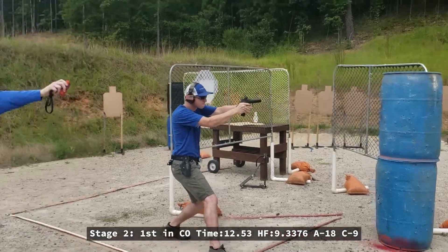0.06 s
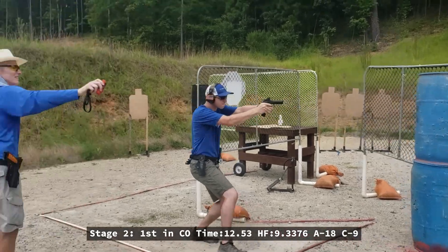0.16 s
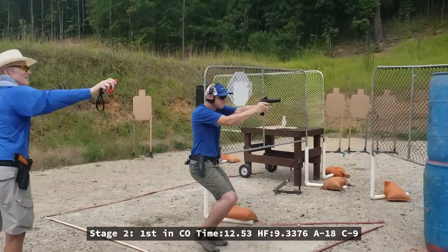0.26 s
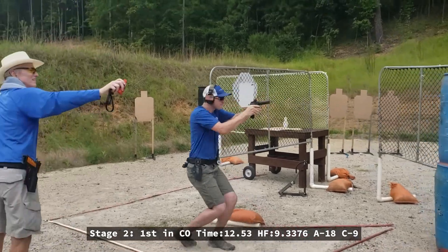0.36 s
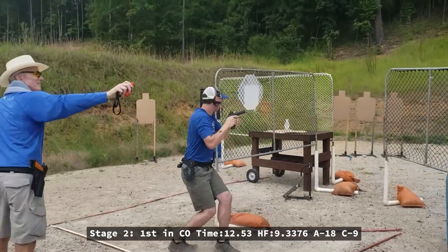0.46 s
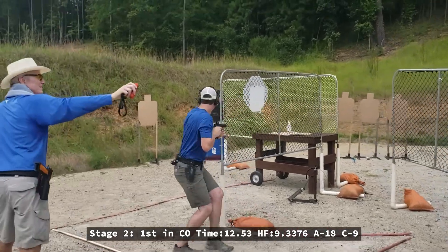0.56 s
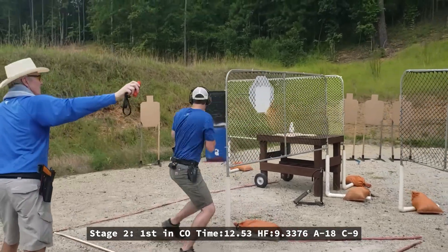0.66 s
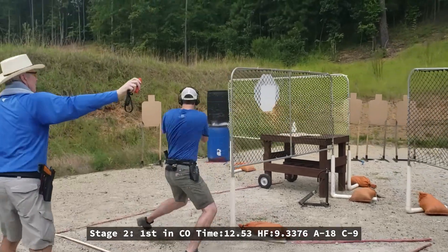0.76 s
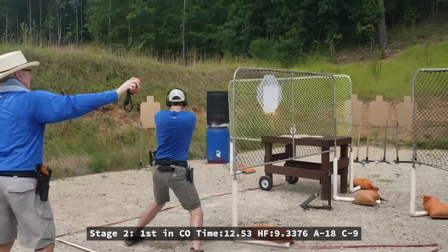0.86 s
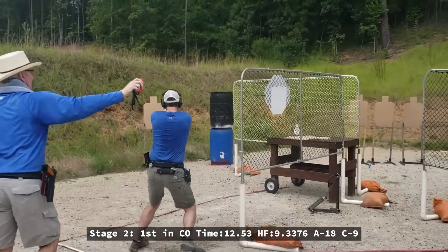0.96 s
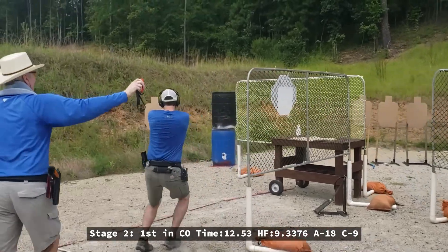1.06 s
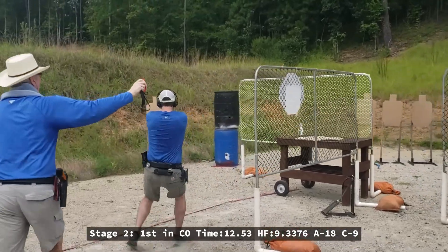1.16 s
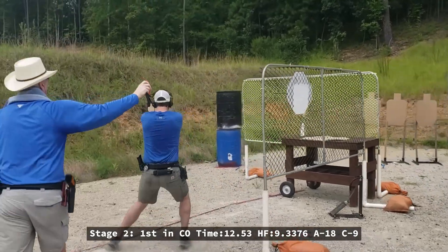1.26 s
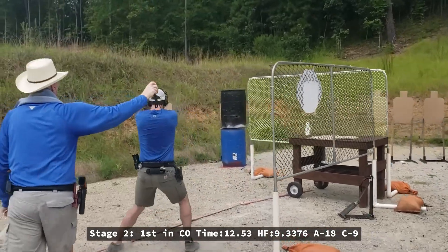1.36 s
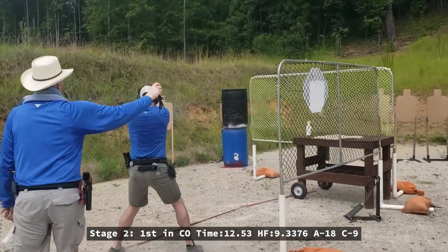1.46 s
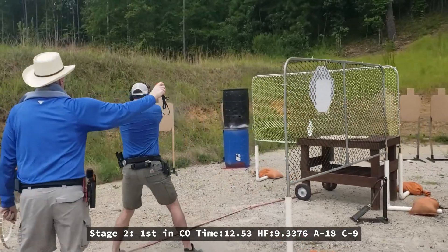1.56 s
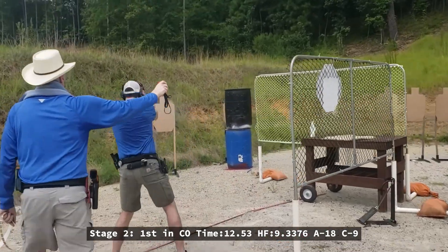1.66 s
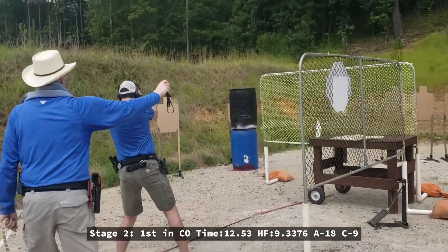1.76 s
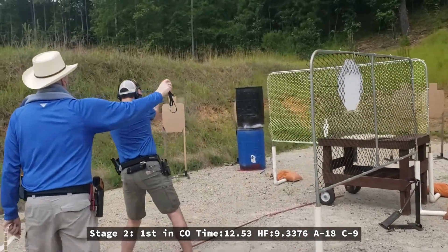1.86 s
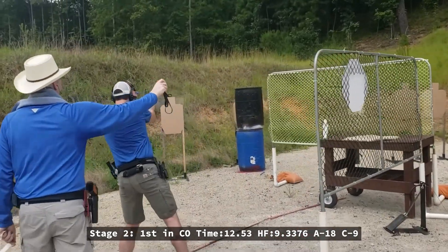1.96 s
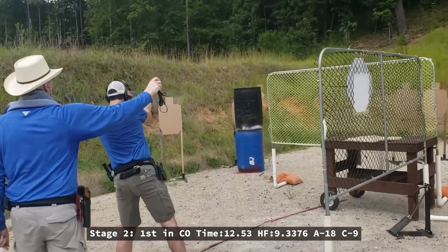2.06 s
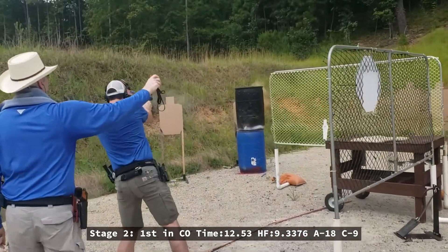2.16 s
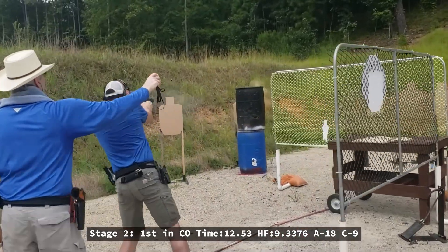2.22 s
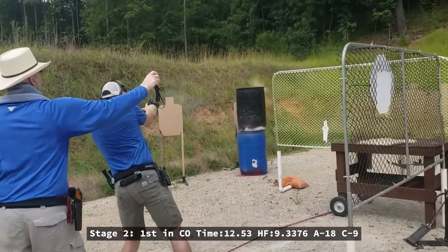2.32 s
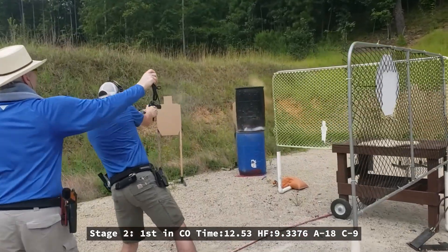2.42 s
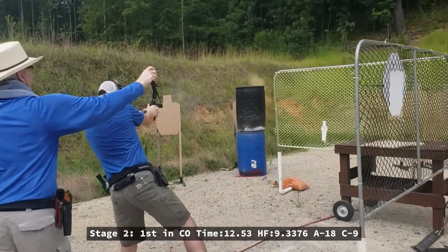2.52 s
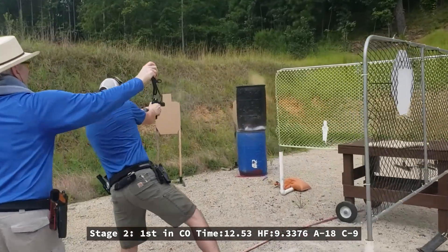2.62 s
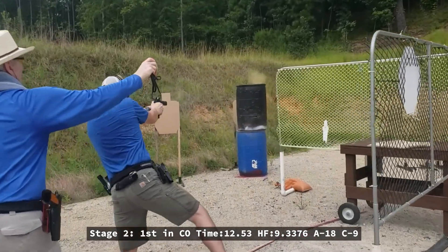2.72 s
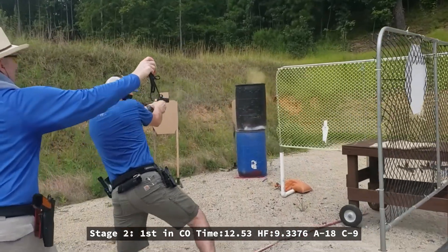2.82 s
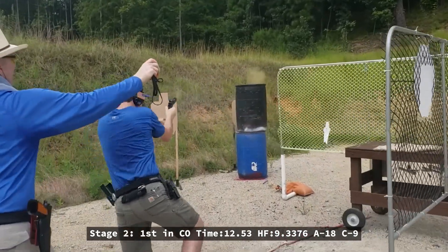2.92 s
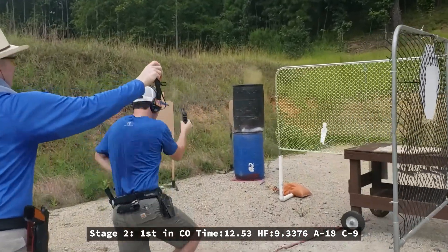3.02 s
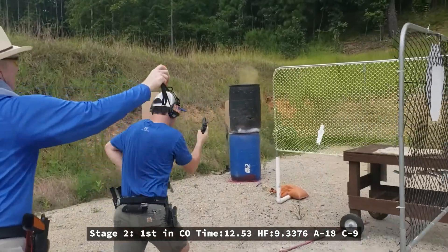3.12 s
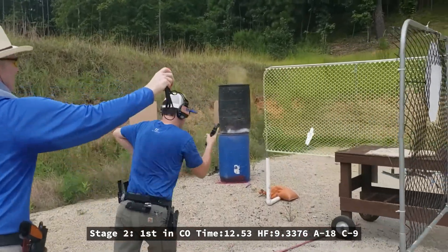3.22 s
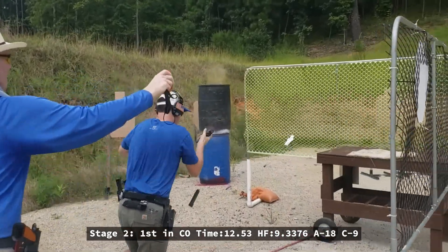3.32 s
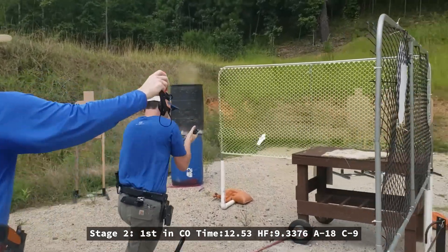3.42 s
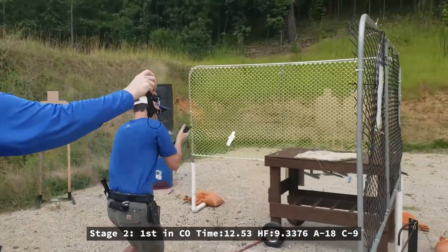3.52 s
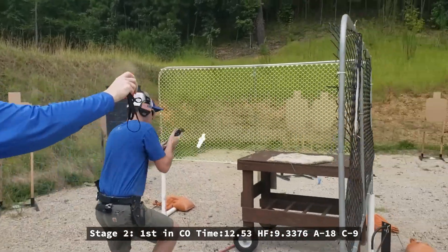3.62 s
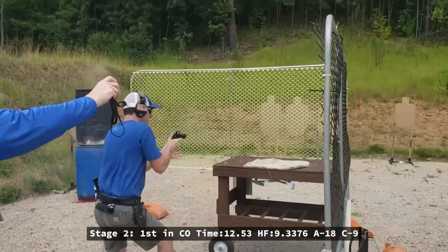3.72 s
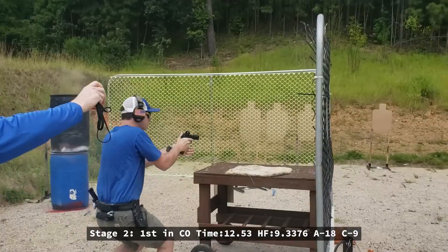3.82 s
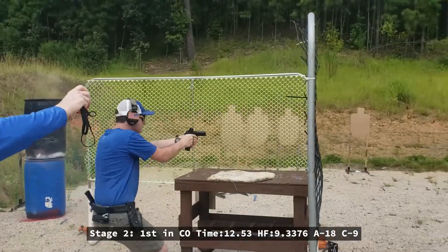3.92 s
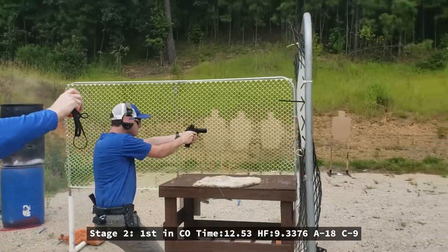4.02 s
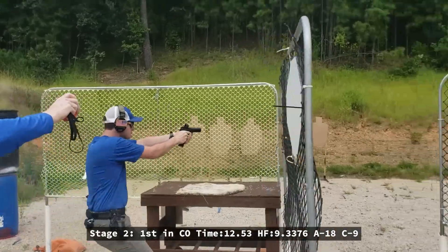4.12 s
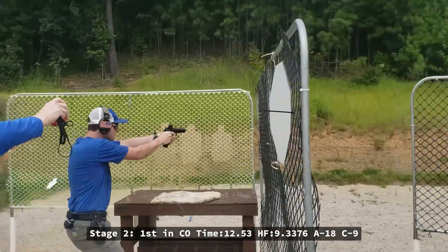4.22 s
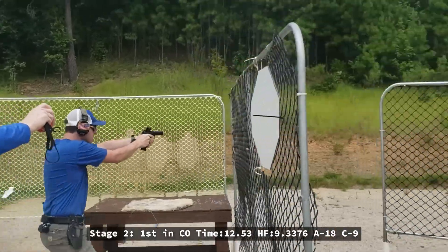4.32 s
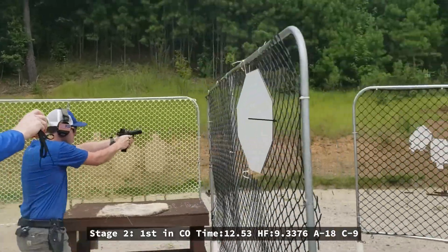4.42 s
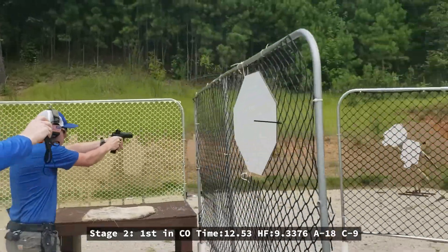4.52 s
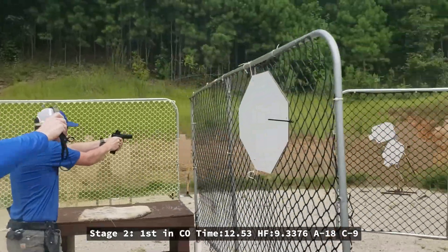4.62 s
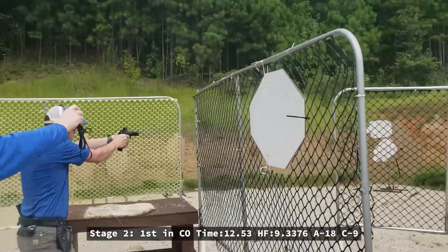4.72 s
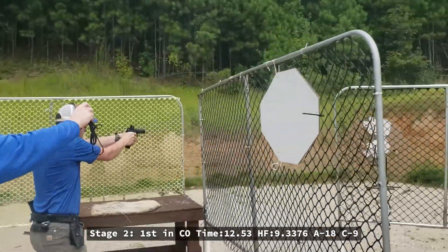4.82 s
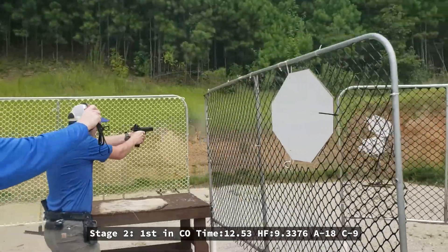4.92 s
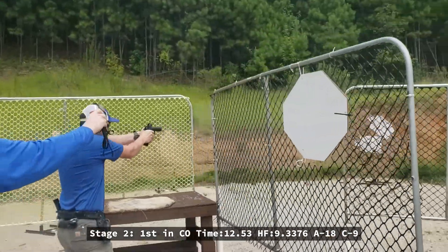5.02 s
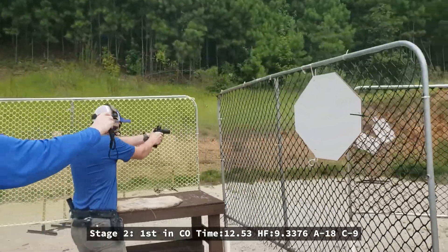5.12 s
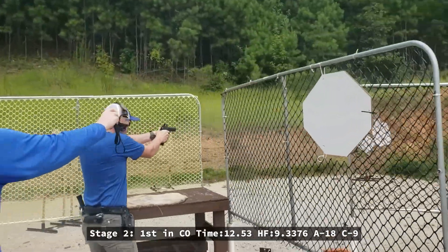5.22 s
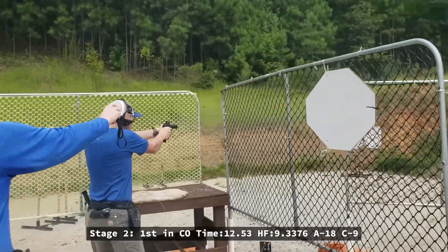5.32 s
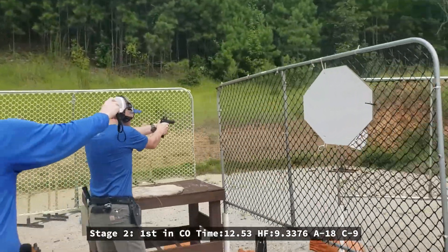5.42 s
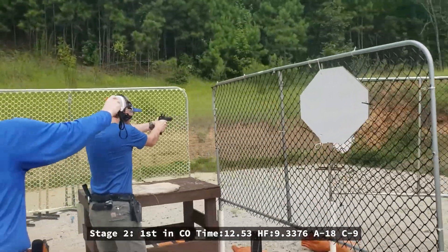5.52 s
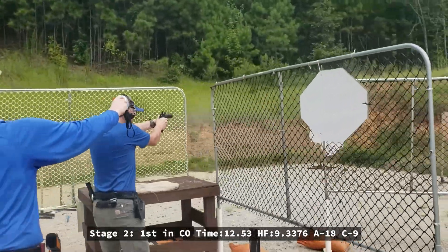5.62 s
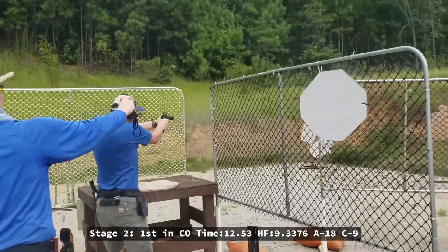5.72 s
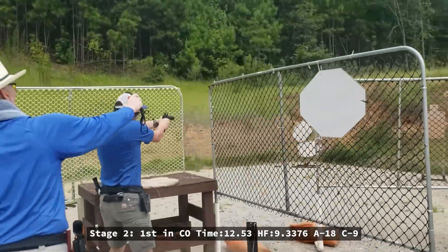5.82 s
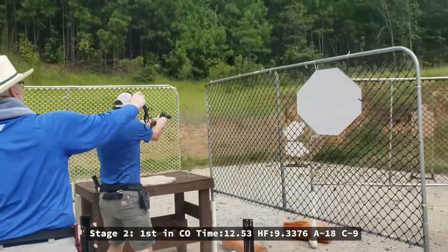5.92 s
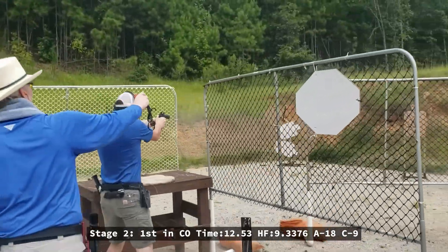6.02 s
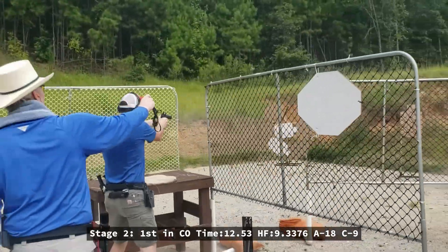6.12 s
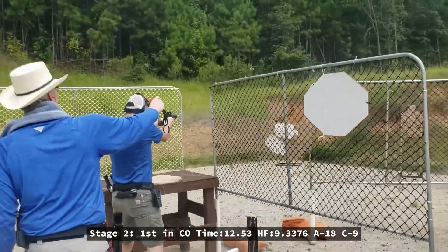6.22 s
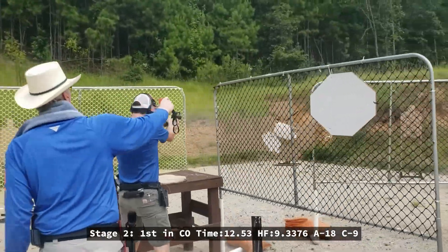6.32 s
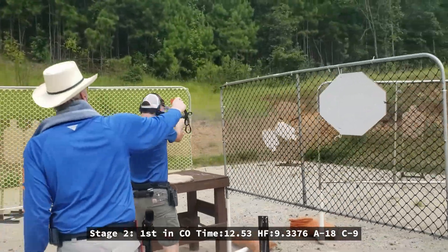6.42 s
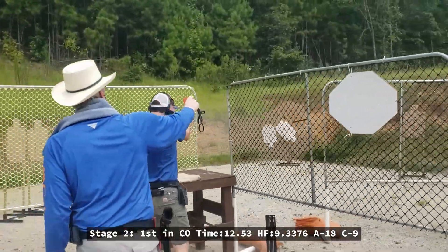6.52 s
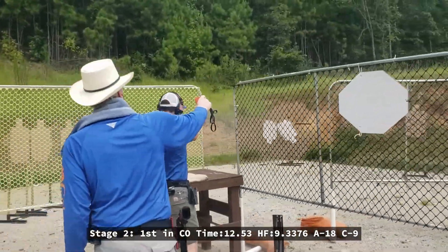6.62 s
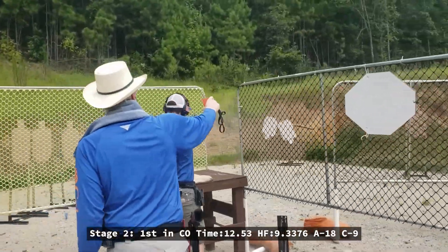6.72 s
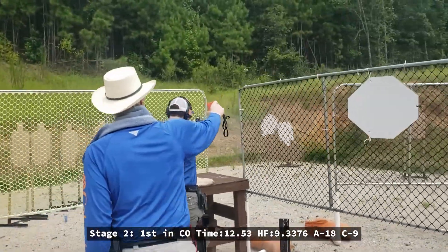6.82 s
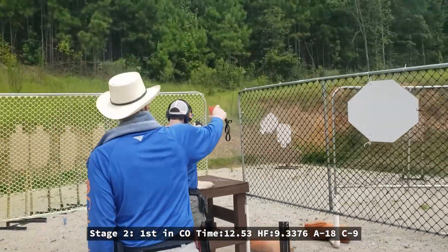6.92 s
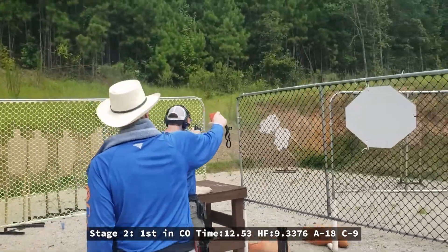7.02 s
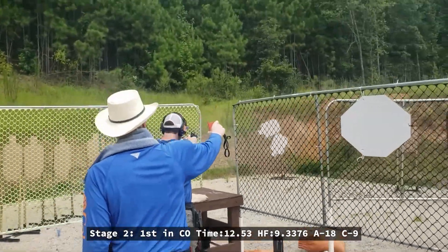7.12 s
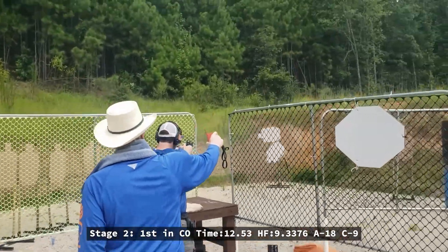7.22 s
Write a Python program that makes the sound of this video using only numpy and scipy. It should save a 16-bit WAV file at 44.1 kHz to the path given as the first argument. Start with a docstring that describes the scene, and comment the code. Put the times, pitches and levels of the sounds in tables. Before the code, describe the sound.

Sharp, overdriven pistol shots fire in quick pairs and a steady closing string, echoing off berms and woods; a struck steel plate sings midway.

```python
"""A gunshot is already rolling through the woods in a faint breeze; a pistol then fires sixteen quick shots.
Each shot is a shock front plus scattered noise, a pressure push and a microphone thump; it bounces off
gravel, prop and berm, fills the earth-walled bay, rolls through the woods and saturates the microphone.
Brass cases tinkle (paired high modes), shoes scuff gravel (grainy noise swells), and one bullet rings a
steel plate (decaying modes and a tone that swells at each port in turn)."""
import sys
import numpy as np
from scipy import signal
from scipy.fft import rfft, irfft, next_fast_len
from scipy.io import wavfile
from scipy.ndimage import uniform_filter1d, map_coordinates

SR = 44100
rng = np.random.default_rng(int(sys.argv[2]) if len(sys.argv) > 2 else 0)


def generate_wav(sig):
    """Save sig (samples, or channels by samples) to the path in sys.argv[1] as 16-bit PCM at SR."""
    pcm = np.round(np.clip(np.atleast_2d(sig).T, -1, 1) * 32767).astype(np.int16)
    wavfile.write(sys.argv[1], SR, pcm)


N = 320587

# pistol shots: (time [s], strength [dB], tilt [dB/octave], L-R [dB], pressure push [dB],
# microphone thump [dB], thump L-R [dB])
SHOTS = [(0.1146, -.5, -.7, 2, -11.5, -21, -7), (0.3136, -0.87, -1.5, 0.5, -10.5, -17, -6.5),
         (1.3311, -1, -2.7, 1.4, -20, -26, -7.5), (1.543, -1, -2.5, 0.5, -25, -33, 15),
         (1.9864, 1, 0.5, 0, -13.5, -19.5, 0), (2.233, 0.5, -2.5, -2.7, -20, -29, -16.5),
         (2.831, 2.2, -3.5, -3.5, -18.5, -25, -11.5), (4.4948, 0.34, -0.2, 3.5, -13, -18, 7),
         (4.725, -.3, -1.4, -6.5, -12, -18.5, 3.5), (5.0107, 0, 0, -1.8, -12.5, -19, -1.5),
         (5.2666, -0.7, -0.2, 4.5, -15.5, -14, -7.5), (5.6615, -0.7, 0.3, -2.5, -14.5, -17.5, -8),
         (5.9246, -.5, -0.5, 0.4, -14, -21, 8), (6.2396, -0.06, 0, 1.4, -28.5, -35.5, 1),
         (6.4933, -0.54, 0.2, 2.5, -24.5, -31.5, 10), (6.8134, 0, -.3, 2, -30, -39, -3)]
# sound paths shared by the shots from one stance: (from time [s], direct [dB], ground [dB], prop delay [s],
# prop [dB], berm delay [s], berm [dB], berm t60 [s], far slap delay [s], far slap [dB])
STANCES = [(0, -15.5, -16.5, .007, -15.5, 0.025, -21.5, .06, .1228, -37),
           (1, -14, -17.5, .0125, -19, .026, -18, .028, 0.16, -48),
           (1.8, -14.5, -22, .0114, -15.5, 0.025, -18, .026, 0.15, -51),
           (4, -16.5, -17, .010, -19.5, .039, -20.5, .013, .15, -36.5),
           (5.15, -17, -15, .0115, -19.5, .0404, -19.5, 0.011, .11, -43),
           (6.1, -16.5, -17, .012, -17, .0418, -20.5, 0.014, 0.13, -47)]
# a shot already rolling through the woods: (time [s], level [dB])
EARLIER_SHOT = (-0.35, -36.5)
# shoes on gravel: (time [s], level [dB], length, twice the swell's rise [s], tilt [dB/octave])
STEPS = [(1.17, -62.5, 0.07, -4.5), (3.505, -57, 0.043, -2), (3.594, -42.5, .013, 5.5),
         (3.607, -43, 0.023, 6.5), (3.744, -53, 0.017, 3.5), (3.825, -63, 0.014, 1), (3.947, -61.5, .01, 3),
         (4.083, -63.5, 0.033, -4), (4.394, -61, 0.056, -1), (4.46, -57.5, 0.018, -1.5)]
# run to the last stance: (start [s], end [s])
RUN_S = (3.2, 4.36)
# spent cases landing: (time [s], level [dB], lower mode [Hz])
CASES = [(.575, -57.5, 11520), (.884, -59, 9880), (1.094, -59, 11050), (1.15, -52.5, 11000),
         (1.215, -56, 10100), (3.115, -47, 10550), (4.275, -65, 10460)]
# steel plate's upper modes: (pitch [Hz], level [dB], t60 [s])
PLATE_MODES = [(2820, -48.5, 0.56), (3343, -48, 0.32), (4130, -39, 0.28), (4377, -39, 0.48),
               (4670, -45, 0.25), (4867, -42, .23), (5170, -33, 0.37), (5145, -31, 0.12), (5437, -41, .18),
               (6735, -29.5, 0.26), (7892, -26.5, .17), (10500, -38.5, .12), (12255, -33.5, 0.14),
               (12560, -37.5, .1)]
# where each port meets its first null: (left [lobes], right [lobes])
PORT_NULL_LOBES = (0.66, .25)
# noise spectra of blast, bay, woods, breeze and far slap: (frequency [Hz], density [dB/Hz])
CRACK_SPECTRUM = [(40, -24), (150, 3.5), (400, -1), (700, 8.5), (1400, 4.5), (3000, 5), (6000, -3.5),
                  (15000, -5.5)]
BAY_SPECTRUM = [(30, -3.5), (100, -0.5), (300, 1), (750, 5.5), (1500, 2), (3000, 4.5), (6000, -1),
                (15000, -7)]
WOODS_SPECTRUM = [(30, -9.5), (90, -5), (170, -4.5), (330, -1), (800, 0.5), (1400, 1), (2200, -0.5),
                  (3500, 2), (5000, 3), (9000, -0.5), (15000, -8.5)]
BREEZE_SPECTRUM = [(25, -2.5), (70, 3), (200, -5), (800, 2), (1500, -2), (3000, -3.5), (6000, -12),
                   (15000, -15.5)]
SLAP_SPECTRUM = [(300, -20.5), (2000, -2.5), (4800, 2), (15000, -11.5)]
# microphone port response: (frequency [Hz], gain [dB])
MIC_RESPONSE = [(20, -7), (45, 0), (700, 3), (1500, 2), (2300, -4), (3300, -0.5), (4000, 2.5), (5000, 11.5),
                (5900, 3.5), (6800, 1), (8300, -14), (9700, 0), (11500, 3.5), (14600, -1.5), (15100, -27),
                (16500, -44)]
# decay of bay and woods: (frequency [Hz], t60 [s])
BAY_T60 = [(60, 0.22), (300, 0.22), (1000, 0.23), (5000, .21), (14000, 0.21)]
WOODS_T60 = [(60, 0.51), (300, 1.27), (900, 1.63), (2500, 1.44), (5000, 0.94), (11000, 0.78)]
# left-right likeness of noise: (frequency [Hz], correlation [0..1])
LIKENESS = [(100, 0.66), (300, .75), (600, .55), (1200, 0.0028), (3000, 0.0032)]

BAY_DB, WOODS_DB = -18, -40.6  # answers to a shot of strength 0 dB
GROUND_DELAY_S = .0033
PROP_T60_S, PROP_TILT_DB_PER_OCT, PROP_PAN_DB = 0.024, -1.76, 0  # pans are L-R
BERM_TILT_DB_PER_OCT, BERM_PAN_DB = -.4, -2.5
ECHO_PAN_SCATTER_DB = 1.5  # from shot to shot
SLAP_GAP_S, SLAP_T60_S = 0.0086, 0.015  # the slap comes back twice
GRIT_DB, GRIT_SCATTER_DB, GRIT_LENGTH_S, GRIT_TILT_DB_PER_OCT = -67, 1.5, 0.026, 0.2
# plate's lowest mode
TONE_HZ, TONE_DB, TONE_RISE_S, TONE_T60_S = 1821, -35.5, .15, 2.08
TONE_LEAD_RAD = 1.35  # of the right port
LOBE_S, LOBE_FLOOR_DB = .447, -18.5  # passing time of the first lobe; depth between lobes
LANDING_S, LANDED_T60_S = 0.56, .2  # time from hit to ground; added decay from there on
SATURATION_LEVEL, TOP_HZ = .5, 16500


def amp(db):
    """Decibels to gain."""
    return 10 ** (np.asarray(db) / 20)


def unit(x):
    """Scale to rms 1."""
    return x / np.sqrt(np.mean(x ** 2) + 1e-20)


def along(points, hz):
    """Read (frequency, value) points on a log-frequency axis."""
    point_hz, values = np.transpose(points)
    return np.interp(np.log(hz + 1), np.log(point_hz), values)


def clock(seconds):
    """Sample times from zero."""
    return np.arange(next_fast_len(int(seconds * SR))) / SR


def fade(t, t60):
    """Exponential decay by 60 dB in t60 seconds."""
    return np.exp(-np.log(1000) * t / np.maximum(t60, 1e-4))


def panned(db):
    """Left and right gains for a level difference."""
    return amp(np.array([[db], [-db]]) / 2)


def add(track, s, sound):
    """Mix a sound into the stereo track at time s, which may lie before the start."""
    start = round(s * SR)
    part = sound[..., max(-start, 0):N - start]
    track[:, max(start, 0):][:, :part.shape[-1]] += part


def noise(t, spectrum, tilt_db=0):
    """Coloured stereo noise of rms 1, alike at the two ports in the bass only; tilt acts above 700 Hz."""
    hz = np.fft.rfftfreq(len(t), 1 / SR)
    turn = np.arccos(np.clip(along(LIKENESS, hz), -1, 1)) / 2
    gain = amp(along(spectrum, hz) + tilt_db * np.log2(np.maximum(hz, 700)))
    white = rfft(rng.standard_normal((2, len(t))))
    mid, side = irfft(white * gain * [np.cos(turn), np.sin(turn)], len(t))
    return unit(np.array([mid + side, mid - side]))


def tail(t, spectrum, t60s, patchy_db, tilt_db):
    """Scattered sound, returning in uneven patches, in which each frequency dies at its own speed."""
    hz, s, z = signal.stft(noise(t, spectrum, tilt_db), SR, nperseg=512)
    field = uniform_filter1d(rng.standard_normal(z.shape[1:]), size=7, axis=0)
    field = uniform_filter1d(field, size=4, axis=1)
    patches = unit(amp(patchy_db * unit(field)))
    decay = fade(s, along(t60s, hz)[:, None])
    return signal.istft(z * patches * decay, SR, nperseg=512)[1][:, :len(t)]


def flutter(t, rate, depth_db):
    """A smooth random gain of rms 1, rate knots a second."""
    knots = rng.standard_normal(int(t[-1] * rate) + 4)
    return unit(amp(depth_db * map_coordinates(knots, [t * rate], mode="nearest")))


def shock(t, length):
    """Blast wave: a pressure jump that falls through zero into a longer suction."""
    u = np.maximum(t, 0) / length
    return (t > 0) * (1 - u) * np.exp(-u)


def crack(t60, tilt_db, front):
    """A shock front, reaching the ports at slightly different times, and the splinters scattered behind it."""
    t = clock(.12)
    lag_s = rng.uniform(0, .0003, (2, 1))
    splinters = noise(t, CRACK_SPECTRUM, tilt_db) * fade(t, t60)
    return front * shock(t - lag_s, length=0.00018) + splinters


def stance(s):
    """The sound paths of the place that the shooter holds at time s."""
    return [row[1:] for row in STANCES if row[0] <= s or row is STANCES[0]][-1]


def breeze():
    """Faint moving air in the trees: noise under a slow random gain."""
    t = clock(N / SR + 1)
    return (amp(-70.5) * noise(t, BREEZE_SPECTRUM) * flutter(t, rate=3, depth_db=1.8))[:, :N]


def woods(tilt_db):
    """The long, rolling answer of the trees."""
    t = clock(2)
    swell = 1 - np.exp(-(t / 0.11) ** 2)
    deepest = 1 / (1 + (t / 0.97) ** 6)  # little comes back from far inside the woods
    rolling = tail(t, WOODS_SPECTRUM, WOODS_T60, patchy_db=3.0, tilt_db=tilt_db)
    return rolling * swell * deepest * flutter(t, rate=140, depth_db=0.84)


def reverberation():
    """The bay fills within milliseconds and empties fast; the woods answer later and longer."""
    out, t = np.zeros((2, N)), clock(0.45)
    # the berms keep returning sound for a moment before the decay takes over
    fill = (1 - np.exp(-t / 0.0051)) / (1 + amp(6.5) * fade(t, t60=.16))
    for s, db, tilt_db, *_ in SHOTS:
        colour_db = 0.12 * tilt_db + .3  # a brighter blast leaves a brighter tail
        bay = tail(t, BAY_SPECTRUM, BAY_T60, patchy_db=2.0, tilt_db=colour_db)
        bay = bay * fill * flutter(t, rate=350, depth_db=1.5)
        add(out, s, amp(db + BAY_DB) * bay)
        add(out, s, amp(db + WOODS_DB) * woods(colour_db))
    s, db = EARLIER_SHOT
    add(out, s, amp(db) * woods(0))
    return out


def pressure_push(t):
    """Two decaying bass swings, with gas and gravel churning in their wake."""
    low = .7 * np.sin(2 * np.pi * 135 * t) * fade(t, t60=.023)
    high = .45 * np.sin(2 * np.pi * 250 * t) * fade(t, t60=.026)
    churn_spectrum = [(40, -12), (110, -2.0), (210, 0.5), (330, -6.5), (600, -25.5), (2000, -60)]
    churn = .3 * noise(t, churn_spectrum) * fade(t, t60=.06)
    return low + high + churn


def microphone_thump(t, pan_db):
    """The bass swing of the microphone; a right port that takes the harder blow recovers later."""
    late = np.maximum(t - np.array([[0], [.0006]]) * max(-pan_db, 0), 0)
    swing = -np.sin(2 * np.pi * 58 * late) * fade(late, t60=.1)
    return panned(pan_db) * swing / (1 + (t / 0.035) ** 6)


def pistol():
    """Muzzle blast and its bounce off the ground; the pressure push sets the microphone's bass swinging."""
    out, t = np.zeros((2, N)), clock(.25)
    for s, db, tilt_db, pan_db, push_db, thump_db, thump_pan_db in SHOTS:
        direct_db, ground_db, *_ = stance(s)
        direct = panned(pan_db) * crack(t60=0.021, tilt_db=tilt_db, front=1.3)
        ground = panned(pan_db) * crack(t60=0.019, tilt_db=tilt_db, front=-0.18)
        add(out, s, amp(db + direct_db) * direct)
        add(out, s + GROUND_DELAY_S, amp(db + ground_db) * ground)
        add(out, s, amp(push_db) * pressure_push(t))
        add(out, s, amp(thump_db) * microphone_thump(t, thump_pan_db))
    return out


def echoes():
    """Each blast returns from a near prop and the berm, smeared by their depth, then as a far double slap."""
    out, t = np.zeros((2, N)), clock(.06)
    for s, db, *_ in SHOTS:
        _, _, prop_s, prop_db, berm_s, berm_db, berm_t60, slap_s, slap_db = stance(s)
        prop_pan, berm_pan = rng.normal([PROP_PAN_DB, BERM_PAN_DB], ECHO_PAN_SCATTER_DB)
        prop = panned(prop_pan) * crack(t60=PROP_T60_S, tilt_db=PROP_TILT_DB_PER_OCT, front=0.87)
        berm = panned(berm_pan) * crack(t60=berm_t60, tilt_db=BERM_TILT_DB_PER_OCT, front=0.71)
        add(out, s + prop_s, amp(db + prop_db) * prop)
        add(out, s + berm_s, amp(db + berm_db) * berm)
        for delay_s in slap_s, slap_s + SLAP_GAP_S:
            slap = noise(t, SLAP_SPECTRUM) * fade(t, SLAP_T60_S)
            add(out, s + delay_s, amp(db + slap_db) * slap)
    return out


def brass():
    """A case ticks on a stone and rings with a close pair of high modes."""
    out, t = np.zeros((2, N)), clock(.4)
    for s, db, hz in CASES:
        modes = np.sin(2 * np.pi * hz * t) + .5 * np.sin(2 * np.pi * (hz + 70) * t)
        ring = modes * fade(t, t60=0.22)
        tick = noise(t, CRACK_SPECTRUM, tilt_db=3) * fade(t, t60=0.017)
        add(out, s, amp(db) * (amp(-11.5) * ring + amp(-2.5) * tick))
    return out


def loose_stones(count):
    """Stones shift as the shooter runs: faint scuffs spread unevenly, as rows like those of the steps."""
    start, end = RUN_S
    rows = []
    for k in range(count):
        s = start + (end - start) * (k + rng.uniform()) / count
        db = GRIT_DB + GRIT_SCATTER_DB * rng.standard_normal()
        rows.append((s, db, GRIT_LENGTH_S, GRIT_TILT_DB_PER_OCT))
    return rows


def footsteps():
    """Each shoe presses a short swell of grating grains out of the gravel."""
    out, t = np.zeros((2, N)), clock(.4)
    for s, db, length_s, tilt_db in STEPS + loose_stones(count=7):
        u = 2 * t / max(length_s, .002)
        swell = (u * np.exp(1 - u)) ** 1.44
        grains = noise(t, CRACK_SPECTRUM, tilt_db) * flutter(t, rate=410, depth_db=4.0)
        add(out, s, amp(db) * grains * swell)
    return out


def tipping_tone(t):
    """The plate's lowest mode builds up, swells at each port in turn as the plate falls, is damped on landing."""
    # the plate tips ever faster, sweeping the mode's lobes across the ports
    lobes = np.sin(np.pi * ((t / LOBE_S) ** 2 - np.array(PORT_NULL_LOBES)[:, None]))
    cycle = 2 * np.pi * TONE_HZ * t + np.array([[0], [TONE_LEAD_RAD]])
    ring = lobes * np.sin(cycle) + amp(LOBE_FLOOR_DB) * np.cos(cycle)
    landed = fade(np.maximum(t - LANDING_S, 0), LANDED_T60_S)
    envelope = (1 - np.exp(-t / TONE_RISE_S)) * fade(t, TONE_T60_S) * landed
    return amp(TONE_DB) * ring * envelope


def steel_target():
    """A bullet splashes on the plate; the high modes die fast, the lowest sings until the plate lands."""
    out, t, struck_s = np.zeros((2, N)), clock(0.85), 2.8945
    for hz, db, t60 in PLATE_MODES:
        phase = rng.uniform(0, 2 * np.pi, (2, 1))
        mode = np.sin(2 * np.pi * hz * t + phase) * fade(t, t60)
        add(out, struck_s, amp(db) * mode * flutter(t, rate=50, depth_db=2.5))
    add(out, struck_s, tipping_tone(t))
    splash = crack(t60=0.11, tilt_db=3.8, front=3.3)
    add(out, struck_s, amp(-22) * splash)
    return out


def scene():
    """All that reaches the microphone."""
    return pistol() + echoes() + reverberation() + steel_target() + footsteps() + brass() + breeze()


def record(dry):
    """The microphone port colours the sound causally, the loudest peaks saturate, and the band ends steeply."""
    size = 2 * next_fast_len((N + SR) // 2)
    hz = np.fft.rfftfreq(size, 1 / SR)
    # folding the cepstrum gives the minimum-phase response
    cepstrum = irfft(np.log(amp(along(MIC_RESPONSE, hz))))
    fold = 1 + np.sign(np.fft.fftfreq(size))
    port = np.exp(rfft(cepstrum * fold))
    voiced = irfft(rfft(dry, size) * port)
    squashed = voiced / (1 + np.abs(voiced / SATURATION_LEVEL) ** 4) ** (1 / 4)
    edge = np.clip((TOP_HZ - hz) / 1500, 0, 1) ** 1.5
    return irfft(rfft(squashed) * edge)[:, :N]


dry = scene()
out = record(dry)
generate_wav(out)
```